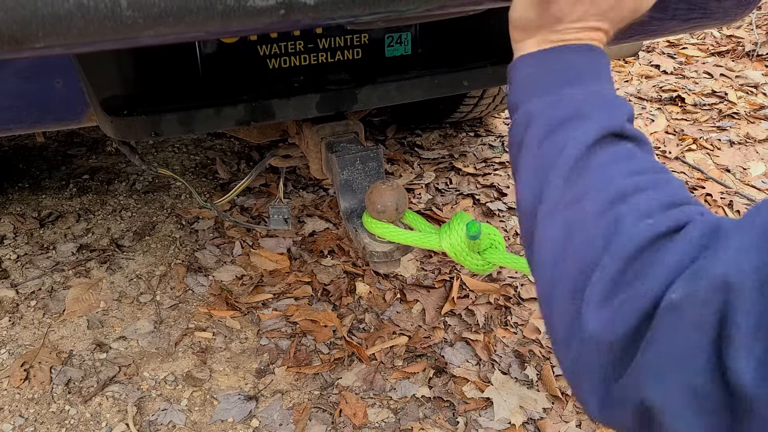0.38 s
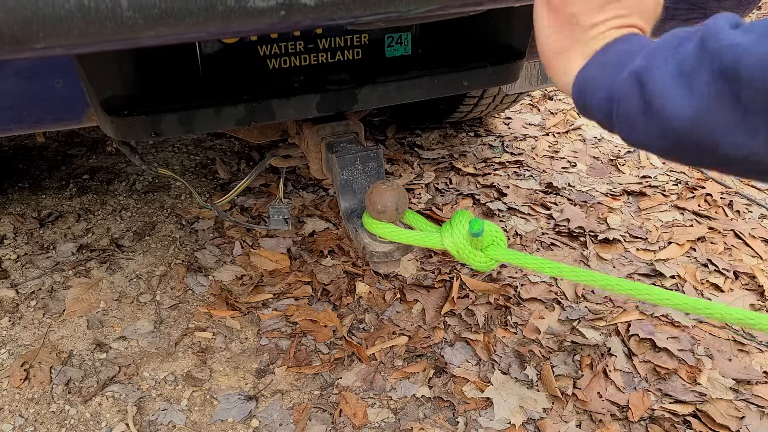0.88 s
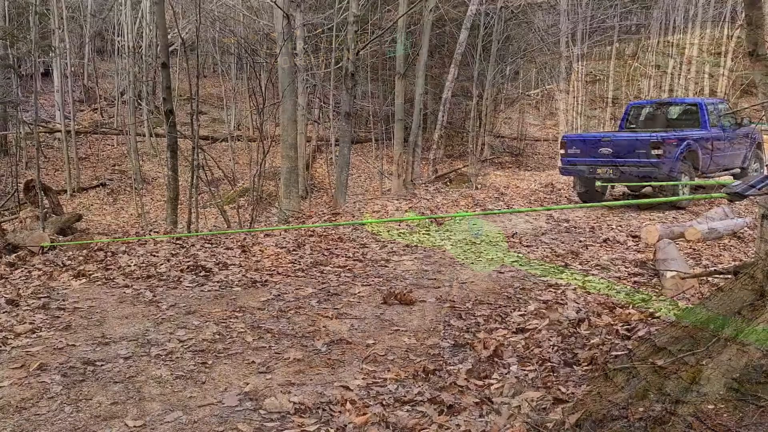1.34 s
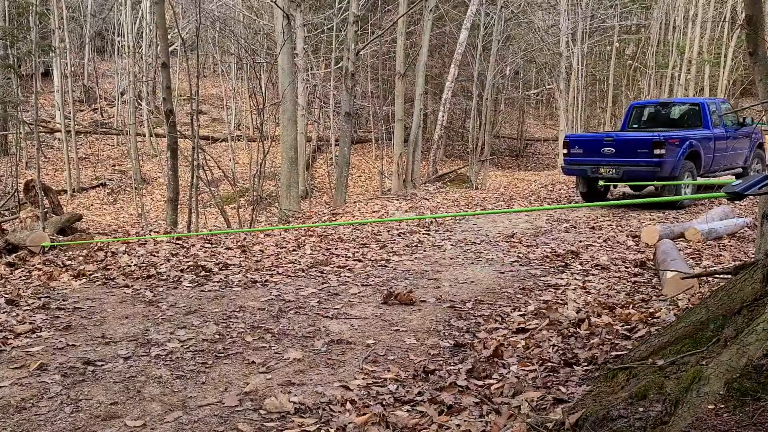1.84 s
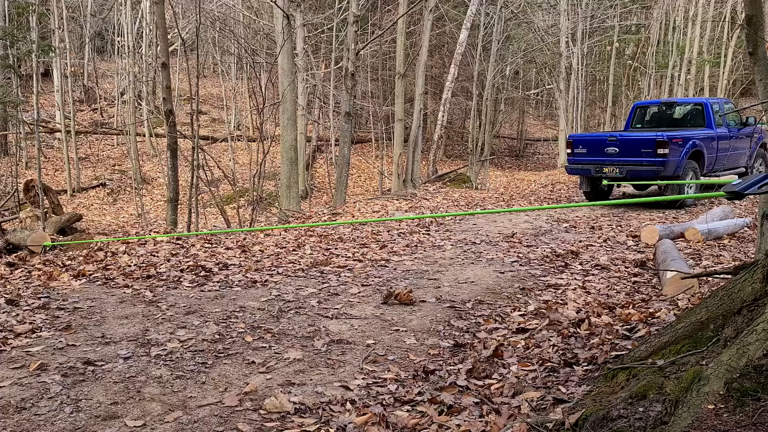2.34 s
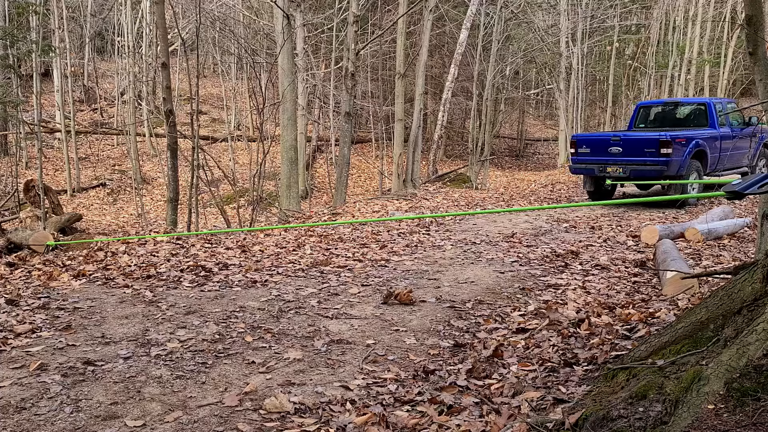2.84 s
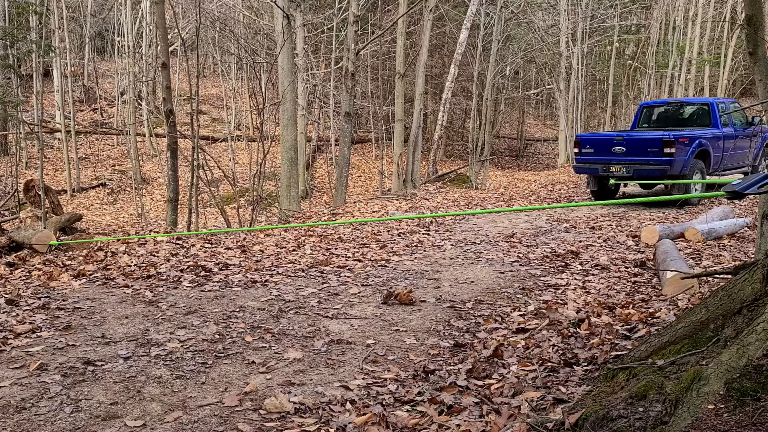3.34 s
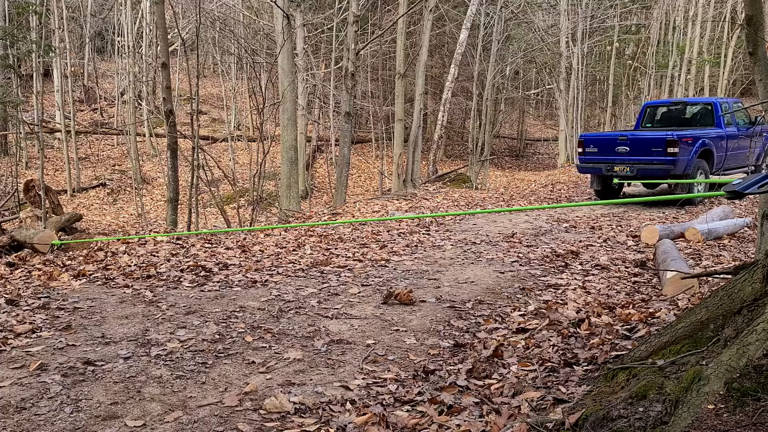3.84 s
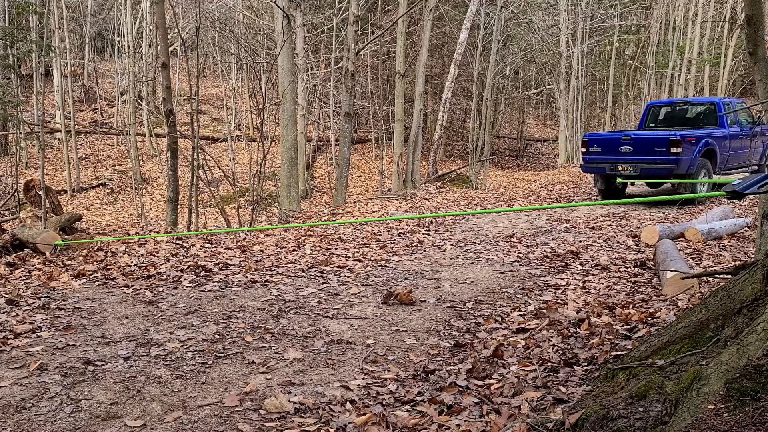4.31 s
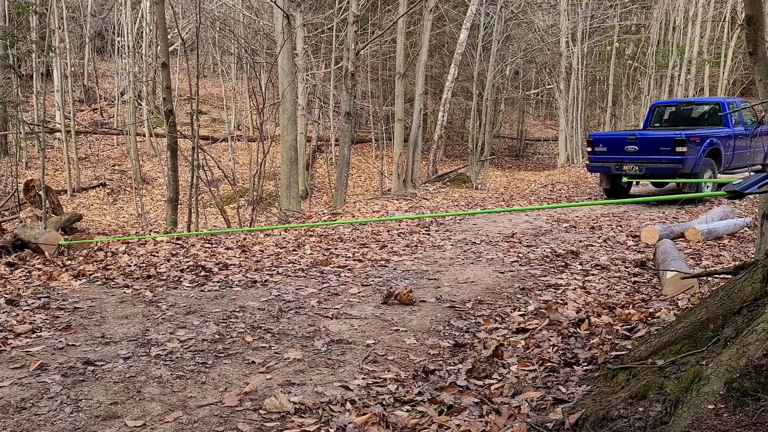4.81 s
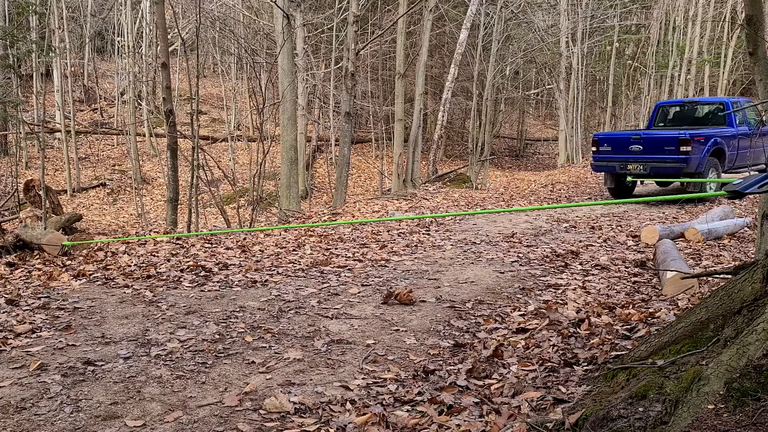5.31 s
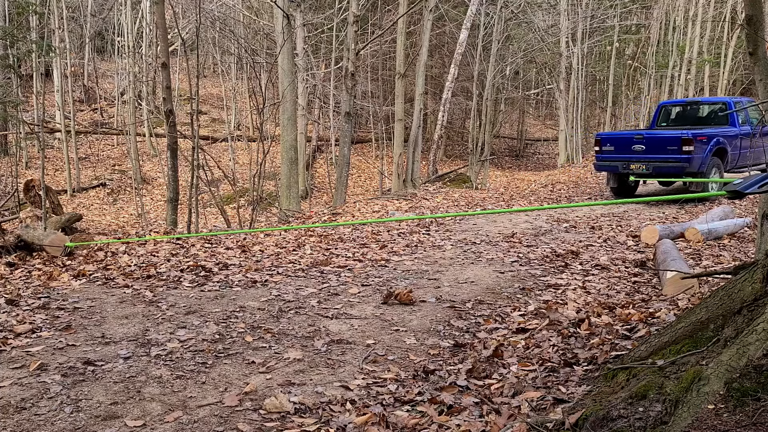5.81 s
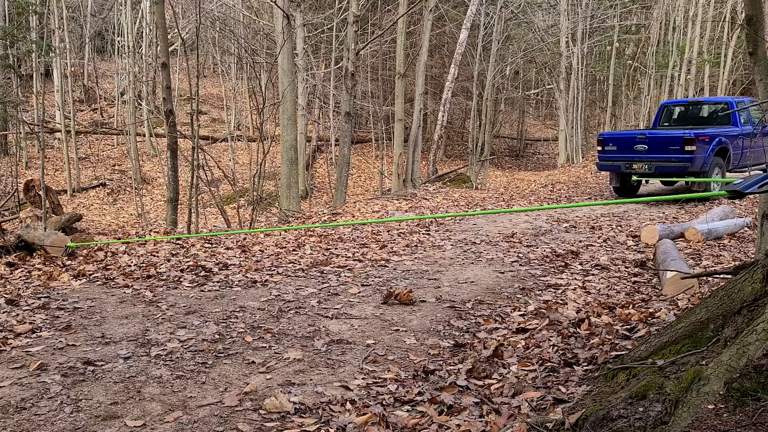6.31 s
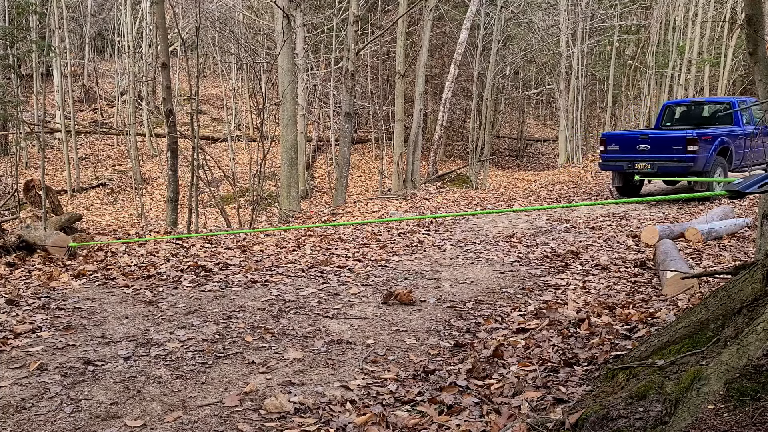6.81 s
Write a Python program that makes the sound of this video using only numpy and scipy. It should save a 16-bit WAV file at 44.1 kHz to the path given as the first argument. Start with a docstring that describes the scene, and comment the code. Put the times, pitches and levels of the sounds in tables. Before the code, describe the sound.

Close to the microphone, soft low thumps, hollow tailgate knocks, scuffing and crackling dry leaves. After about a second this fades into a wider woodland view: a pickup's lumpy six-cylinder engine drops in revs, pulls steadily under load, sinks near idle, then surges loudly. A roped log creaks and jerks with woody knocks, sharp twigs snap and leaves hiss as it drags.

```python
"""First, close by, someone kneels in dry leaves at a truck's tailgate: dying rings make the thumps and hollow
knocks, shaped noise the rustle. Then a fade leads to the truck down a woodland track. Its six-cylinder engine
revs against a roped log: uneven puffs ring the exhaust pipe, one bank firing far weaker than the other.
The log creaks as small slips ring its wood, twigs snap, and crackling noise makes the leaves hiss as it drags."""
import sys
import numpy as np
from scipy import signal
from scipy.fft import rfft, irfft, next_fast_len
from scipy.io import wavfile

SR = 44100
rng = np.random.default_rng(int(sys.argv[2]) if len(sys.argv) > 2 else 0)


def unload_audio(sound):
    """Save the sound as a 16-bit wav file, at the path given as the first command line argument."""
    columns = np.transpose(np.atleast_2d(sound))
    # keep every value between -1 and 1, then stretch to whole-number steps
    steps = np.round(np.clip(columns, -1, 1) * 32767)
    wavfile.write(sys.argv[1], SR, steps.astype(np.int16))


N = 305172

# the six cylinders in firing order: (relative strength [dB], lateness [firing gaps])
CYLINDERS = [(-2.5, -.01), (-10.5, -.1), (1.1, .02), (-13.3, -.02), (.3, -.02), (-9.5, .03)]
# ringing of exhaust pipe and muffler: (frequency [Hz], width [Hz], relative level [dB])
PIPE_MODES = [(50, 12, -16.5), (77, 20, -12.3), (140, 8, -15.7), (158, 9, -8.7), (163, 18, 2.2),
              (180.5, 13, -1.1)]
# ringing of the body panels: (frequency [Hz], width [Hz], relative level [dB])
PANEL_MODES = [(226.7, 22, -31), (285, 35, -30), (346.2, 8.4, -21.5), (446.4, 3.5, -24.5), (913, 27, -43.5)]


def exhaust(rate, fired, throttle_db):
    """Each firing sends a puff down the pipe; unequal puffs ring the pipe, muffler and body panels."""
    count = np.arange(1, int(fired[-1]))
    strength_db, late = np.transpose(CYLINDERS)[:, count % len(CYLINDERS)]
    late_luck, strength_luck = rng.standard_normal((2, len(count)))
    # combustion varies more near idle
    unsteady = np.clip(60 / np.interp(count, fired, rate) - 0.7, 0.1, 2)
    moment = count + late + 0.015 * unsteady * late_luck
    at = np.interp(moment, fired, np.arange(N)).astype(int)
    puffs = np.zeros(N)
    puffs[at] = gain_of(strength_db + 1.6 * unsteady * strength_luck)
    pipe = 0
    for k, (hz, width_hz, db) in enumerate(PIPE_MODES + PANEL_MODES):
        # a wide resonance dies fast; neighbours start with opposite signs
        pipe = pipe + (-1) ** k * width_hz * ring(hz, db, 2.19 / width_hz, size=12000, rise=0.0005)
    # more firings per second carry more power, so the root of the rate evens them out
    sound = signal.oaconvolve(puffs / np.sqrt(rate), pipe)[:N]
    return evened(sound) * gain_of(throttle_db)


# boom of the drones as they pass the truck's resonances: (frequency [Hz], level over the throttle curve [dB])
BOOM = [(30, -14), (43, -13.5), (56, -32.5), (72, -16.5), (88, 3.5), (105, -11.5), (122, -5), (135, -15),
        (150, -1), (165, -4), (178, -12.5), (195, -37)]


def drones(rate, fired, throttle_db):
    """Clean tones at one, two and three times the firing rate boom as they pass the truck's resonances."""
    sway = 0.016 * wander(hz=9)  # the crank wavers between firings, in firing gaps
    tones = np.zeros(N)
    for times, start in [(1, 0), (2, -0.6), (3, -0.3)]:
        level_db = throttle_db + read(BOOM, times * rate)
        tones += gain_of(level_db) * np.cos(2 * np.pi * times * (fired + start + sway))
    return tones * gain_of(1.0 * wander(hz=21.0))  # and its load throbs


# colour of the block and fan: (frequency [Hz], relative level per Hz [dB])
CLATTER_COLOUR = [(120, -38), (200, -8.5), (231, -9.5), (353, -17.5), (582, -35), (904, -29.5), (1090, -31),
                  (3400, -45), (6000, -80), (7800, -84.5), (13200, -120)]


def clatter(fired, throttle_db):
    """The block and fan make noise that pulses gently once per firing."""
    noise = rng.standard_normal((2, N)) * (1 + 0.34 * np.cos(2 * np.pi * fired))
    # the block gets louder by only half of the throttle's rise in dB
    return colour(noise, CLATTER_COLOUR) * gain_of(-31.5 + 0.5 * throttle_db)


# colour of the shaking truck body: (frequency [Hz], relative level per Hz [dB])
RUMBLE_COLOUR = [(15, 9), (45, 12.5), (120, 22), (300, -50.5)]


def body_rumble(rate):
    """The truck body shakes with low noise, most at low revs."""
    return colour(rng.standard_normal((2, N)), RUMBLE_COLOUR) * gain_of(-44.5 - 0.5 * (rate - 53.0))


# engine speed: (time [s], firing rate [firings/s])
SPEED = [(1.12, 63.01), (1.6, 61.19), (1.9, 56.1), (2.26, 45.38), (2.6, 37.35), (2.76, 35.33), (3.1, 40.4),
         (3.45, 42.79), (3.85, 42.66), (4.42, 46.81), (4.73, 43.7), (4.82, 41.8), (4.92, 37.8),
         (5.11, 35.5), (5.37, 29.6), (5.7, 29.6), (5.83, 30.5), (5.94, 38.25), (6.18, 57.9), (6.36, 64.16),
         (6.52, 65.66), (6.92, 61.07)]
# engine load: (time [s], exhaust level [dB])
THROTTLE = [(1.2, -36), (1.3, -27), (1.65, -24.5), (2.05, -28.5), (2.3, -32.5), (2.75, -33.5), (3.45, -25),
            (4.75, -26), (5.05, -31.5), (5.6, -37.5), (5.82, -37.5), (6.05, -21.5), (6.45, -14),
            (6.9, -18.5)]


def engine():
    """One speed and one throttle curve drive the exhaust and drones, and the wide clatter and rumble."""
    gate, throttle_db = curves(THROTTLE, (1.12, 1.2))
    rate = np.interp(np.arange(N) / SR, *np.transpose(SPEED))
    fired = np.cumsum(rate) / SR + 0.6  # firings so far
    direct = exhaust(rate, fired, throttle_db) + drones(rate, fired, throttle_db)
    diffuse = clatter(fired, throttle_db) + body_rumble(rate)
    return gate * direct, gate * diffuse


# strain on the rope: (time [s], creaking level [dB])
STRAIN = [(1.3, -73), (2.6, -58.5), (3.44, -56), (4.05, -49.5), (4.99, -47), (5.9, -54), (6.9, -57.5)]
# jerks that ring the log: (time [s], level [dB])
JERKS = [(1.7945, -34.5), (2.1459, -28), (2.507, -33.5), (2.6445, -32), (2.812, -35), (2.863, -19.5),
         (2.879, -28), (2.997, -29), (3.2833, -22.5), (3.561, -26), (3.579, -31.5), (3.66, -26.5),
         (3.7697, -35.5), (3.9099, -27), (3.9732, -50), (4.072, -30.5), (4.105, -32), (4.1875, -25),
         (4.2496, -32), (4.5035, -43), (4.5255, -33), (4.5674, -29.5), (4.6268, -29), (4.7642, -25),
         (4.8577, -34), (4.9111, -36), (4.943, -17.5), (5.0111, -24.5), (5.0456, -22.5), (5.0697, -42),
         (5.1351, -33), (5.1685, -40), (5.2353, -30), (5.2535, -19.5), (5.8172, -26), (6.8211, -24),
         (6.9045, -18)]
# ringing of the log: (frequency [Hz], relative level [dB], time to fall 60 dB [s])
LOG_MODES = [(257, -6, 0.067), (699, -8.5, 0.025), (1247, -10.5, 0.03), (1329, 4, 0.032), (1406, -4, 0.031),
             (1930, -2.5, 0.016), (2080, -14.5, 0.032)]


def log_wood():
    """Stick-slip: nearly even slips, with small stray ones, ring the wood as creaking; jerks ring it harder."""
    gate, creak_db = curves(STRAIN, (1.2, 1.4))
    stray_db = 3 * np.minimum(rng.exponential(1, N), 2.5)
    slips = gain_of(stray_db) * (rng.random(N) < 120 / SR) * rng.choice([-1, 1], N)
    slip_rate = 31 * (1 + 0.12 * wander(hz=14))  # even slips per second
    turns = np.floor(np.cumsum(slip_rate) / SR)
    slips += np.diff(turns, prepend=0) * gain_of(9 + 3.2 * rng.standard_normal(N))
    jerks = strikes(JERKS, column=1)
    spots = 6  # places along the log that slip
    spot = rng.integers(0, spots, N)
    creak, rings = np.zeros((2, N))
    for k in range(spots):  # each spot weights and tunes the modes its own way
        wood = 0
        for hz, db, t60 in LOG_MODES:
            tuning, weight = rng.standard_normal(2)
            wood = wood + ring(hz * (1 + 0.014 * tuning), db + 2.5 * weight, t60, rise=0.0015)
        wood = wood / abs(wood).max()
        creak += signal.oaconvolve(slips * (spot == k), wood)[:N]
        rings += signal.oaconvolve(jerks * (spot == k), wood)[:N]
    return evened(creak) * gate * gain_of(creak_db) + rings


# twigs that snap: (time [s], level [dB], extra top end [dB])
TWIGS = [(2.1074, -28.5, -5), (2.1898, -33.5, 5.5), (2.2395, -11, -3), (2.6903, -8.5, -3),
         (2.8652, -22, -26), (3.5033, -25.5, -9), (3.549, -31.5, -1), (3.578, -34, 7), (4.943, -30.5, -24),
         (5.4494, -26, 3), (5.8, -31, 0), (6.7005, -34.5, 1), (6.9045, -41, -4)]
# colour of a snap: (frequency [Hz], relative level per Hz [dB])
SNAP_COLOUR = [(760, -50), (1050, -7), (1340, 0), (1620, -4), (1950, -2.5), (2470, -16.5), (3260, -7.5),
               (4520, -7.5), (5400, 0.5), (7580, -27), (8150, -30.5), (11400, -13.5), (16000, -21)]


def twig_snaps():
    """A twig snaps as a click and a short noise burst, then scatter off the trees; jerks crack bark too."""
    t = np.arange(4000) / SR
    crack = np.minimum(t / 0.0004, 1) * gain_of(-5 - 60 * t / 0.013)
    scatter = np.minimum(t / 0.0026, 1) * gain_of(-32 - 60 * t / 0.09)
    bark = gain_of(-13) * strikes(JERKS, column=1)
    return cracks(TWIGS, crack + scatter, SNAP_COLOUR, lift_db=0, click=2.4, more=bark)


# forward lurches of the log: (time of the top [s], hiss level [dB], swell time [s], sink time [s])
LURCHES = [(2.899, -44.5, 0.52, 0.64), (4.05, -41.5, 0.49, 0.46), (4.988, -42.5, 0.77, 0.56),
           (5.719, -45, 0.16, 0.13), (5.88, -42.5, 0.82, 0.37), (6.95, -35.5, 0.2, 0.17)]
# colour of the dragged leaves: (frequency [Hz], relative level per Hz [dB])
LEAF_COLOUR = [(180, -27), (300, -9), (455, -15), (900, -24.5), (1340, -21.5), (1610, -24), (2520, -25),
               (3240, -20), (4230, -25), (6000, -35.5), (6740, -51), (7080, -66.5), (9090, -46.5),
               (11700, -38.5), (16000, -39.5)]


def dragged_leaves():
    """Many small rubs and crackles hiss as the log drags, swelling with each lurch."""
    gate = np.interp(np.arange(N) / SR, (1.2, 1.4), (0, 1))
    hiss_db = swells(*np.transpose(LURCHES), bed_db=-60.5)
    hiss = colour(grainy(per_s=150, spread_db=3, share=0.12), LEAF_COLOUR)
    hiss *= gain_of(1.18 * wander(hz=11.3))  # the heap of leaves slides unevenly
    dull = signal.sosfiltfilt(signal.butter(4, 5800, fs=SR, output="sos"), hiss)
    bright = (hiss - dull) * gain_of(0.18 * (hiss_db + 44.0))  # a harder drag is brighter
    return (dull + bright) * gate * gain_of(hiss_db)


# hand and rope knocks: (time [s], level [dB], hardness [dB per octave above the second mode])
KNOCKS = [(0.132, -25, 0), (0.138, -33.5, 17.5), (0.151, -7.5, -9), (0.176, -14.5, -9.5),
          (0.228, -17.5, -6), (0.271, -38, 19), (0.62, -26.5, -0.5), (0.773, -38, 13), (1.076, -42, 16.5),
          (1.141, -23, -9), (1.178, -36, 10)]
# ringing of the hollow tailgate: (frequency [Hz], relative level [dB], time to fall 60 dB [s])
HOLLOW_MODES = [(128, -4.5, 0.034), (314, -15, 0.12), (358, -2, 0.031), (496, -3, 0.031), (643, -8, 0.055)]


def knocks():
    """A knock rings the hollow tailgate; harder ones ring the high modes more and tick more."""
    sound = np.zeros(N)
    for s, db, hard in KNOCKS:
        hollow = 0
        for k, (hz, mode_db, t60) in enumerate(HOLLOW_MODES):
            octaves = max(np.log2(hz / HOLLOW_MODES[1][0]), 0)
            hollow = hollow + (-1) ** k * ring(hz, mode_db + hard * octaves, t60, rise=0.0044)
        sound += signal.oaconvolve(strikes([(s, db)], column=1), hollow)[:N]
    fall = gain_of(-60 * np.arange(2000) / SR / 0.029)
    hits = strikes([(s, db + hard) for s, db, hard in KNOCKS], column=1)
    tick = signal.oaconvolve(hits, fall)[:N] * gain_of(-4)
    return sound + colour(tick * rng.standard_normal(N), [(300, 15.0), (900, 7.5), (3000, 2.5), (6000, -80)])


# weight shifts on the ground: (time [s], level [dB], frequency [Hz], left over right [dB])
THUMPS = [(0.02, -27.5, 63, -14), (0.081, -22.5, 54.6, -6), (0.314, -15.5, 53.5, 9),
          (0.369, -18.5, 54.3, -7), (0.412, -17.5, 72.5, 3), (0.512, -25.5, 41, 0), (0.598, -27, 32.5, -4),
          (0.806, -22, 51.7, -3), (0.871, -15.5, 53.6, -5), (1.01, -20.5, 55, -9), (1.047, -28, 45, -3)]


def thumps():
    """Each shift of weight on the ground is one soft, low, dying ring, nearer one side or the other."""
    sound = np.zeros((2, N))
    for s, db, hz, side_db in THUMPS:
        thump = ring(hz, 0, 0.16, size=9000, rise=0.0057)
        sides = gain_of([[side_db / 2], [-side_db / 2]])
        sound += sides * signal.oaconvolve(strikes([(s, db)], column=1), thump)[:N]
    return sound


# moves at the tailgate: (time of the top [s], swell time [s], scuff level [dB], leaf rustle level [dB])
MOVES = [(0.146, 0.028, -36.5, -53.5), (0.233, 0.029, -32.5, -55), (0.431, 0.0066, -49, -62.5),
         (0.463, 0.034, -34.5, -50.5), (.69, 0.11, -83, -61), (.82, 0.017, -50.5, -64),
         (0.864, 0.12, -36, -41.5), (0.917, 0.088, -44.5, -45), (1.076, .02, -51.5, -49),
         (1.178, 0.03, -40, -42), (1.33, 0.1, -48, -47)]
# colour of the scuffing: (frequency [Hz], relative level per Hz [dB])
SCUFF_COLOUR = [(94, -42.5), (160, -6), (301, -7.5), (374, -9), (451, -9), (1190, -11), (1440, -18),
                (4000, -25), (5200, -60), (8800, -120)]
# colour of the rustling leaves: (frequency [Hz], relative level per Hz [dB])
RUSTLE_COLOUR = [(710, -19.5), (1200, -12.5), (1440, -14.5), (1890, -10.5), (3220, -7.5), (5240, -11.5),
                 (6500, -25), (7000, -41.5), (8400, -37), (9100, -28), (9820, -30.5), (11600, -23.5),
                 (16000, -24.5)]


def scuff_and_rustle():
    """Rubbing makes grainy noise, low for scuffs and high for leaves, that swells with each move."""
    top_s, swell_s, scuff_top_db, rustle_top_db = np.transpose(MOVES)
    sink_s = 0.047
    scuff_db = swells(top_s, scuff_top_db, swell_s, sink_s, bed_db=-45)
    rustle_db = swells(top_s, rustle_top_db, swell_s, sink_s, bed_db=-56)
    scuff_db = scuff_db + 2.47 * wander(hz=24.6)  # the rubbing is lumpy
    scuff = colour(grainy(per_s=67, spread_db=2.5, share=0.35), SCUFF_COLOUR)
    rustle = colour(grainy(per_s=400, spread_db=2, share=0.2), RUSTLE_COLOUR)
    return scuff * gain_of(scuff_db) + rustle * gain_of(rustle_db)


# single leaves that crack: (time [s], level [dB], extra top end before a common lift [dB])
LEAF_CRACKS = [(0.0691, -42, -34), (0.1281, -39, -32), (0.1355, -30.5, -26), (0.1929, -43, -46),
               (0.2258, -41, -31), (0.2536, -44, -30), (0.2718, -45, -53), (0.4304, -49.5, 3.5),
               (0.468, -43, -12.5), (0.6594, -41, -19), (0.846, -39, -23), (0.8956, -30.5, -13),
               (0.9144, -26, -16), (1.076, -50, -28), (1.1757, -40, -14), (1.252, -32, -33),
               (1.344, -34.5, -24)]


def leaf_cracks():
    """A single leaf cracks as a short dying burst of noise."""
    fall = gain_of(-3.0 - 60 * np.arange(2000) / SR / 0.027)
    return cracks(LEAF_CRACKS, fall, RUSTLE_COLOUR, lift_db=20.0)


# colour of the rumble of shifting weight: (frequency [Hz], relative level per Hz [dB])
GROUND_COLOUR = [(25, 2), (60, 11.5), (180, 12.5), (320, -85)]


def ground_rumble():
    """Shifting weight makes low noise that reaches the two sides partly unlike."""
    left, other = colour(rng.standard_normal((2, N)), GROUND_COLOUR) * gain_of(-44.5)
    return np.array([left, 0.62 * left + 1.07 * other])


# phase by which the left side leads for near sound: (frequency [Hz], lead [radians])
NEAR_LEAD = [(0, 0), (2930, -4.7), (6290, -12.9), (8350, -24.7), (16300, -47.8)]


def tailgate():
    """Knocks and leaf cracks are direct, scuffs and rustle diffuse; thumps and rumble bring their own sides."""
    gate = np.interp(np.arange(N) / SR, (1.36, 1.43), (1, 0))
    above = ports(knocks() + leaf_cracks(), gate * scuff_and_rustle(), NEAR_LEAD)
    return above + thumps() + gate * ground_rumble()


def gain_of(db):
    """Decibels to gain."""
    return 10 ** (np.asarray(db) / 20)


def evened(x):
    """Scales to rms 1."""
    return x / np.sqrt(np.mean(x ** 2) + 1e-20)


def read(points, hz):
    """Reads a spectrum on a log-frequency axis."""
    f, value = np.transpose(points)
    return np.interp(np.log(hz + 1), np.log(f + 1), value)


def curves(rows, fade_in):
    """A gate that opens over (from, to) seconds, then the columns at every sample."""
    s, *columns = np.transpose(rows)
    t = np.arange(N) / SR
    return np.interp(t, fade_in, [0, 1]), *(np.interp(t, s, c) for c in columns)


def colour(x, points):
    """Filters by a spectrum, keeping the power of white noise."""
    gain = gain_of(read(points, np.fft.rfftfreq(N, 1 / SR)))
    return irfft(rfft(x) * evened(gain), N)


def wander(hz):
    """Smooth chance, rms 1, with nothing much faster than hz."""
    return evened(signal.sosfilt(signal.butter(4, hz, fs=SR, output="sos"), rng.standard_normal(N)))


def grainy(per_s, spread_db, share):
    """Two streams of noise swelling together in sparse 2 ms crackles of very uneven size."""
    size_db = spread_db * np.minimum(rng.exponential(1, N), 4)
    grains = gain_of(size_db) * (rng.random(N) < per_s / SR)
    bursts = evened(signal.lfilter([1], [1, -np.exp(-500 / SR)], grains))
    return rng.standard_normal((2, N)) * np.sqrt(1 - np.clip(share, 0, 1) + share * bursts ** 2)


def ring(hz, db, t60, size=4000, rise=1e-4):
    """One dying mode with a soft start."""
    t = np.arange(size) / SR
    return gain_of(db - 60 * t / t60) * np.sin(2 * np.pi * hz * t) * (1 - np.exp(-t / rise)) ** 2


def strikes(rows, column):
    """A click at each event time with the level of one column."""
    out = np.zeros(N)
    np.add.at(out, [round(r[0] * SR) for r in rows], [gain_of(r[column]) for r in rows])
    return out


def swells(top_s, top_db, swell_s, sink_s, bed_db):
    """Level in dB of a steady bed plus humps 10 dB lower one swell time before and one sink time after the top."""
    t = np.arange(N)[:, None] / SR - top_s
    humps_db = top_db - 10 * np.where(t < 0, -t / swell_s, t / sink_s)
    return 10 * np.log10((gain_of(humps_db) ** 2).sum(1) + gain_of(bed_db) ** 2)


def cracks(rows, shape, points, lift_db, click=0, more=0):
    """Clicks and noise bursts of one shape and colour, each with its own amount of sound above 7500 Hz."""
    noise = rng.standard_normal(N)
    sos = signal.butter(6, 7500, fs=SR, output="sos")

    def burst(hits):
        return colour(click * hits + signal.oaconvolve(hits, shape)[:N] * noise, points)

    low = burst(strikes(rows, column=1) + more)
    top = burst(strikes([(s, db + top_db + lift_db) for s, db, top_db in rows], column=1))
    return signal.sosfiltfilt(sos, low) + top - signal.sosfiltfilt(sos, top)


# how alike diffuse sound is on the two sides: (frequency [Hz], likeness [0-1])
LIKENESS = [(40, 1), (90, 1), (200, 0.94), (500, 0.73), (1300, 0.1), (5000, 0)]
# left side over right side: (frequency [Hz], level [dB])
SIDE_DB = [(60, 2), (120, -0.5), (240, -1), (480, -0.5), (950, -2), (1890, -2.5), (3770, 3), (7520, 14),
           (15000, 3.5)]


def ports(direct, diffuse, lead):
    """Left and right hear direct sound with unlike level and phase, and diffuse sound only partly alike."""
    size = next_fast_len(N + SR // 10)
    hz = np.fft.rfftfreq(size, 1 / SR)
    like = np.clip(read(LIKENESS, hz), 0, 1)
    # half of the difference goes to each side
    half = gain_of(read(SIDE_DB, hz) / 2) * np.exp(0.5j * np.interp(hz, *np.transpose(lead)))
    d = rfft(direct, size)
    a, b = rfft(diffuse, size)
    left = (d + a) * half
    right = (d + like * a + np.sqrt(1 - like ** 2) * b) / half
    return irfft(np.array([left, right]), size)[:, :N]


# phase by which the left side leads for far sound: (frequency [Hz], lead [radians])
FAR_LEAD = [(0, 0), (600, 0.4), (1460, -1.8), (2930, -2.0), (6200, 4.0), (6800, 3.4), (7150, 6.8),
            (8790, 5.5), (14600, 14.0), (16300, 12.4)]


def scene():
    """The tailgate from close by, then the truck and log from afar."""
    engine_direct, engine_diffuse = engine()
    wood = log_wood() + twig_snaps()
    far = ports(engine_direct + wood, engine_diffuse + dragged_leaves(), FAR_LEAD)
    return far + tailgate()


def band_limit(x):
    """A steep low-pass at the top of the band."""
    return signal.sosfilt(signal.butter(12, 16680, fs=SR, output="sos"), x)


def record(dry):
    """A steep low-pass ends the treble at 16 kHz."""
    edge = signal.firwin(511, 16000, window=("kaiser", 9), fs=SR)
    mix = signal.oaconvolve(dry, edge[None], "same")
    return band_limit(mix)


dry = scene()
out = record(dry)
unload_audio(out)
```